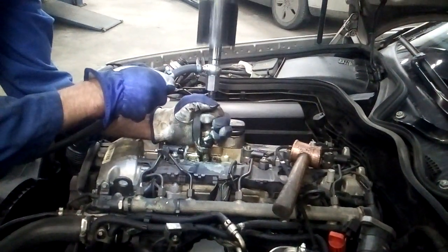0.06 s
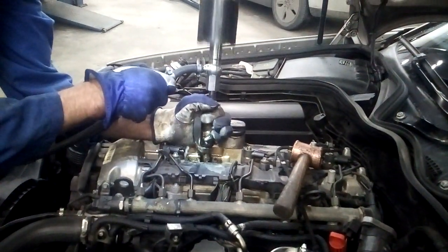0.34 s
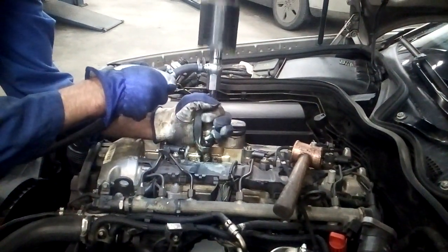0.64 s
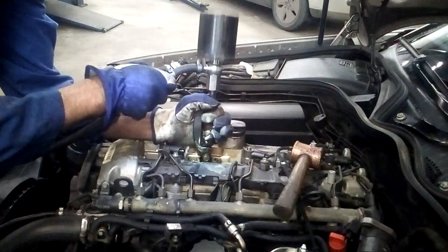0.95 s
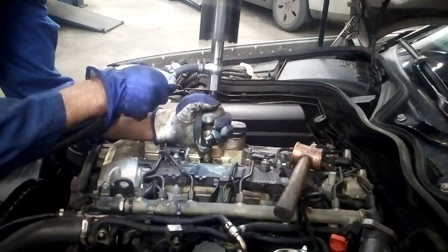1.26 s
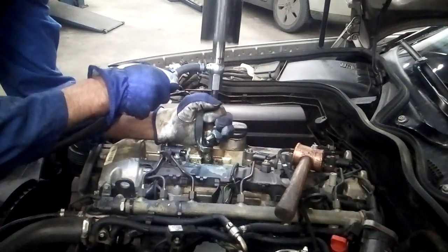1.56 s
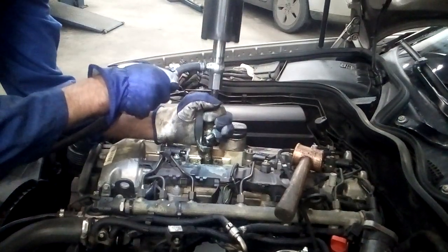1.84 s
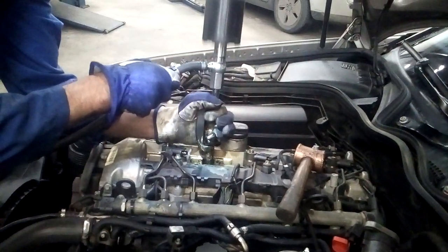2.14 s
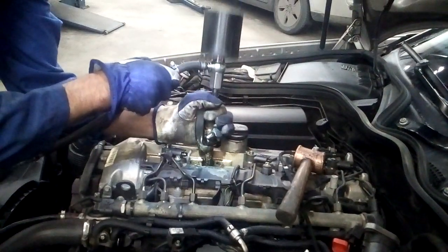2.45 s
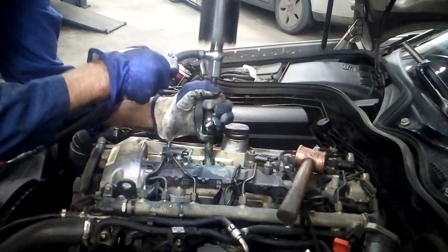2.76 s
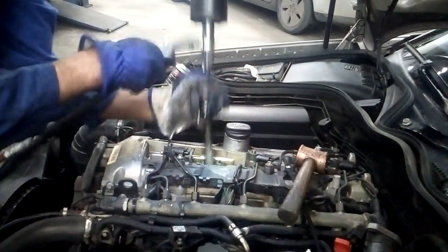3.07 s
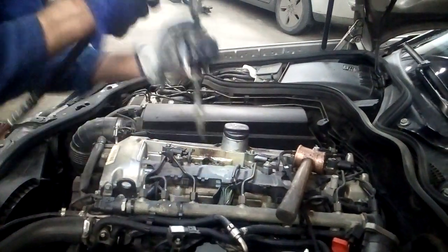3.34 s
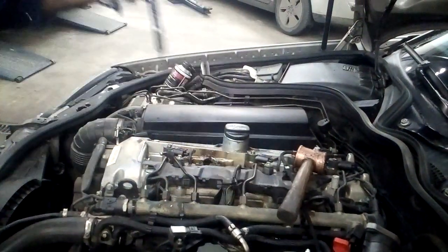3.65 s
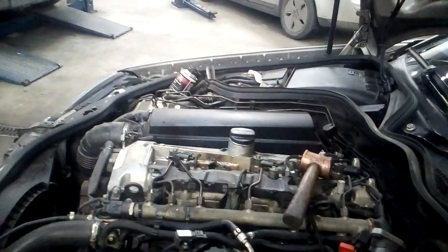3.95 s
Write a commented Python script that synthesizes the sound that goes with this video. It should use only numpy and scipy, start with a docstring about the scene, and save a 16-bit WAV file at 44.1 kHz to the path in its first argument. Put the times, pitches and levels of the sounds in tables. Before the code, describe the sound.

An air-driven slide hammer slams steel repeatedly, hissing between blows, in an echoing garage.

```python
"""A hiss of air, a thump and clack, then a slam of steel, over and over in an echoing garage bay.
It is an air-driven slide hammer pulling a stuck part out of an engine: air drives a weight,
which thumps and clacks as it turns at one end, then slams into the other. When the part comes free
the strokes run faster; then the air stops and the bay rings out over a machine hum.
The camera's gain control turns the sound down at every blow, and its left microphone is muffled."""
import sys
import numpy as np
from scipy import signal
from scipy.fft import rfft, irfft
from scipy.io import wavfile
from scipy.ndimage import uniform_filter1d, minimum_filter1d

SR = 44100
rng = np.random.default_rng(int(sys.argv[2]) if len(sys.argv) > 2 else 0)


def master(y):
    """Save y as 16-bit WAV."""
    cut = np.clip(np.atleast_2d(y).T, -1, 1)
    pcm = np.round(cut * 32767)  # scale
    wavfile.write(sys.argv[1], SR, pcm.astype(np.int16))


N = 176400  # 4 seconds


def amp(db):
    """Turns decibels into a number to multiply by."""
    return 10 ** (np.asarray(db) / 20)


def unit(x):
    """Scales a signal to an average (rms) level of 1."""
    return x / np.sqrt(np.mean(x ** 2) + 1e-20)


def look_up(table, hz):
    """Reads between a table's rows, with pitch spaced in octaves."""
    f, value = np.transpose(table)
    return np.interp(np.log(hz + 1), np.log(f + 1), value)


def add(mix, start_s, sound):
    """Mixes a sound in at the given time."""
    part = mix[max(round(start_s * SR), 0):][:len(sound)]
    part += sound[:len(part)]


def colour(x, tone):
    """Makes lows and highs louder or softer, following a tone table."""
    log_gain = np.log(amp(look_up(tone, abs(np.fft.fftfreq(8192, 1 / SR)))))
    response = np.exp(np.conj(signal.hilbert(log_gain)))  # rings after a hit, never before
    return signal.oaconvolve(x, np.fft.ifft(response).real[:4096])[:len(x)]


def noise(tone, size):
    """Noise of level 1; the table sets only its tone."""
    return unit(colour(rng.standard_normal(size), tone))


def wander(hz):
    """A random wobble, up to about hz times a second."""
    keep_slow = np.exp(-(np.fft.rfftfreq(N, 1 / SR) / hz) ** 2)
    return unit(irfft(rfft(rng.standard_normal(N)) * keep_slow, N))


# The low notes of a machine (f/Hz, level/dB)
HUM_NOTES = [(48.4, -43), (135, -48), (323, -51)]
# Tone of the background noise (f/Hz, level/dB)
BACKGROUND_TONE = [(25, -22), (60, -2), (130, -4), (350, -6.5), (1000, -17), (5000, -6.5), (10000, -56)]
def workshop(waver=0.0117, noise_db=-32.5):
    """A machine hums, wavering a little, over the dull background of the bay."""
    wavering_time = np.cumsum(1 + waver * wander(hz=7.3)) / SR
    hum = sum(amp(db) * np.sin(2 * np.pi * (hz * wavering_time + rng.random())) for hz, db in HUM_NOTES)
    return np.sqrt(2) * hum + amp(noise_db) * noise(BACKGROUND_TONE, N)


# How long the bay rings; "fade" is the time to drop by 60 dB (f/Hz, fade/s)
ECHO_FADE = [(100, .7), (1000, 1.3), (3000, 1.4), (6000, 1.0), (15000, .3)]
# Tone of the echo (f/Hz, level/dB)
ECHO_TONE = [(200, -4.5), (2000, -7), (5000, -10.5), (12000, -7.5)]
def bay_echo(x, gain_db=-13, build_s=0.089):
    """The bay smears each sound into a tail whose highest notes die first."""
    hz, t, bands = signal.stft(rng.standard_normal(SR * 2), SR, nperseg=256)
    fade = amp(-60 * t / look_up(ECHO_FADE, hz)[:, None])
    tail = signal.istft(bands * fade, SR, nperseg=256)[1]
    tail *= np.minimum(np.arange(len(tail)) / SR / build_s, 1)
    echo = signal.fftconvolve(x, tail / np.linalg.norm(tail))[:N]
    return amp(gain_db) * colour(echo, ECHO_TONE)


def metal_reflections(x, gain_db=1, fade_s=.03, size=1500):
    """High sounds bounce straight back off the metal around the camera."""
    bounces = rng.standard_normal(size) * amp(-60 * np.arange(size) / SR / fade_s)
    highs = signal.sosfilt(signal.butter(1, 600, "high", fs=SR, output="sos"), x)
    return amp(gain_db) * signal.oaconvolve(highs, bounces / np.linalg.norm(bounces))[:N]


# The whistle's strength next to the inlet hiss (t/s, level/dB)
WHISTLE_SWELL = [(1.2, -11), (1.33, 2), (1.39, 11), (1.53, 9), (1.78, 1), (2.0, -19)]
def valve_whistle(venting, pitch_hz=14860, sag_hz=90, wobble_hz=18, flutter_db=3):
    """The air valve's thin whistle sags in pitch as the air is let out."""
    hz = pitch_hz - sag_hz * venting + wobble_hz * wander(hz=61.6)
    db = np.interp(np.arange(N) / SR, *np.transpose(WHISTLE_SWELL)) + flutter_db * wander(hz=62)
    return amp(db) * np.sin(2 * np.pi * np.cumsum(hz) / SR)


def inlet_swish(travel, low_hz=8900, arch_hz=750, width_hz=600):
    """A narrow hiss that rises and falls in pitch as the weight travels (0 to 1)."""
    phase = 2 * np.pi * np.cumsum(low_hz + arch_hz * np.sin(np.pi * travel)) / SR
    return wander(width_hz) * np.cos(phase) + wander(width_hz) * np.sin(phase)


# Tone of the air flowing in (f/Hz, level/dB)
INLET_TONE = [(150, -15.5), (480, -7.5), (1500, -2), (2000, -2.5), (2400, 0), (3350, 1), (4400, -1),
              (5700, 1.5), (6600, 3), (8000, -3.5), (9300, -2), (11800, -9), (13600, -9.5), (15300, 1),
              (15700, -38)]
# Tone of the air let out (f/Hz, level/dB)
VENT_TONE = [(150, -10), (400, -12.5), (1800, -6), (2600, 2), (5400, 2.5), (6500, 9.5), (8000, -1.5),
             (13000, -7.5), (15300, 2), (15700, -30)]
def air(strokes, free_s=2.92, build_s=0.035, switch_s=0.0032, flutter_db=0.63):
    """Air hisses in until the weight turns, then out; with the part free it only hisses out."""
    t = np.arange(N) / SR
    inlet, vent, venting, travel = np.zeros((4, N))
    start = -.03
    for turn, blow, *_ in strokes:
        span = (t >= start) & (t < blow)
        elapsed = t[span] - start
        travel[span] = np.minimum(elapsed / (turn - start), 1)
        venting[span] = turned = np.clip((t[span] - turn) / switch_s, 0, 1)
        if blow > free_s:
            vent[span] = amp(-4.5 - 11 * turned)  # loud, easing at the turn
        else:
            soft_start_db = -11.5 * np.clip(1 - elapsed / build_s, 0, 1)
            inlet[span] = amp(-19 + soft_start_db) * (1 - turned)
            vent[span] = amp(-25.5) * turned
        start = blow
    whistle = valve_whistle(venting)
    air_in = inlet * (amp(-9) * inlet_swish(travel) + noise(INLET_TONE, N) + whistle)
    air_out = vent * (noise(VENT_TONE, N) + amp(-3) * whistle)
    return (air_in + air_out) * amp(flutter_db * wander(hz=111))


THUMP_LEAD_S = 0.00429  # the thump starts just before the turn
def thump(end_hz=144.2, drop_hz=205, drop_s=0.0024, rise_s=0.0029, decay_s=0.0059):
    """The air cushion's short knock, dropping in pitch, with little deep bass."""
    t = np.arange(4000) / SR
    hz = (end_hz + drop_hz * np.exp(-t / drop_s)) * (1 + .04 * rng.standard_normal())
    loudness = np.minimum(t / rise_s, 1) * np.exp(-t / decay_s)
    push = loudness * np.sin(2 * np.pi * np.cumsum(hz) / SR)
    return signal.sosfilt(signal.butter(2, 100, "high", fs=SR, output="sos"), push)


# Tone of the dull knock (f/Hz, level/dB)
KNOCK_TONE = [(40, -14), (130, 5), (800, 6), (1600, -10), (16000, -63)]
def knock(decay_s, size=4000):
    """The freed part's heavy knock, with no ring."""
    return noise(KNOCK_TONE, size) * np.exp(-np.arange(size) / SR / decay_s)


def ping(hz, decay_s=.0042):
    """One bright note of the loose steel; its pitch depends on how the part sits."""
    t = np.arange(4000) / SR
    return np.sqrt(2) * np.sin(2 * np.pi * hz * t) * np.exp(-t / decay_s)


def strike(tone, notes, decay_s, ring_db=-9.5, rise_s=0.00096, detune=0.0058, vary_db=2):
    """Steel on steel: a noisy crash and a few ringing notes, never quite the same twice."""
    t = np.arange(6000) / SR
    hz, db, fade_s = np.transpose(notes)[:, :, None]
    level, shift, phase = rng.standard_normal((3, len(notes), 1))
    waves = np.sin(2 * np.pi * (hz * (1 + detune * shift) * t + phase))
    ring = (amp(db + vary_db * level - 60 * t / fade_s) * waves).sum(0)
    ring /= np.sqrt(np.sum(amp(db) ** 2) / 2)
    crash = noise(tone, len(t)) * np.exp(-t / decay_s)
    return np.minimum(t / rise_s, 1) * (crash + amp(ring_db) * ring)


# Tone of the clack (f/Hz, level/dB)
CLACK_TONE = [(300, -15.5), (650, -15.5), (1700, -9), (3300, -5.5), (4700, -9.5), (6400, -1.5), (7000, -12),
              (13000, -21), (15000, -6), (16000, -21)]
# Ringing notes of the tool's tube (f/Hz, level/dB, fade/s)
TUBE_NOTES = [(2030, 4, 0.021), (3270, 9.5, 0.037), (4280, 5, 0.05), (6120, -25, 0.02), (6140, -8.5, 0.064)]
def clack():
    """The weight turns round and sets the tube ringing."""
    return strike(CLACK_TONE, TUBE_NOTES, decay_s=0.0073)


# Tone of the main blow (f/Hz, level/dB)
SLAM_TONE = [(40, -33), (150, -5.5), (300, -7.5), (500, -1.5), (750, -2), (1100, -3.5), (2200, 3),
             (4400, 1), (6200, 2), (8000, -4), (11000, -9.5), (13800, -8.5), (14900, 7.5), (15400, -62),
             (16000, -4)]
def slam(notes, **settings):
    """The weight hits the far end with a sharp crash."""
    return strike(SLAM_TONE, notes, rise_s=0.00069, **settings)


# Fast strokes with the part free (turn t/s, blow t/s, blow level/dB, ping f/Hz, ping level/dB)
FAST_STROKES = [(3.033,3.0354,7.5,1850,-11),(3.122,3.1235,5.5,3060,-14),(3.2077,3.2215,4,2770,-7),(3.287,3.3081,3.5,2420,-9),
                (3.38,3.397,4.5,2436,-9),(3.467,3.488,2.5,3120,-5.5),(3.559,3.5778,2.5,2510,-8.5),(3.655,3.6719,-3.5,2310,-10.5)]
# Ringing notes of the loose steel (f/Hz, level/dB, fade/s)
LOOSE_NOTES = [(1170, 7.5, 0.016), (1450, 0, 0.017), (2160, -12, 0.019), (4950, -1, 0.06), (5794, 2, 0.053),
               (7080, -2.5, 0.053)]
# Clinks of the loose steel (t/s, level/dB)
CLINK_HITS = [(2.8786, -12), (2.9607, 2.5), (3.192, 2), (3.8148, -3.5)]
# Tone of a clink (f/Hz, level/dB)
CLINK_TONE = [(200, -9), (2500, 0), (6000, 8.5), (7500, -11), (16000, -21)]
def hammer_free(break_s=3.036):
    """The part breaks free: each stroke thumps, slams, pings and knocks, and loose steel clinks."""
    out = np.zeros(N)
    for turn, blow, blow_db, ping_hz, ping_db in FAST_STROKES:
        force = amp(10 + blow_db)
        add(out, blow, force * slam(LOOSE_NOTES, decay_s=0.0056, ring_db=-6, detune=0.0234))
        add(out, turn - THUMP_LEAD_S, amp(-7) * thump())
        add(out, blow, force * amp(ping_db) * ping(ping_hz))
        add(out, blow, amp(-7) * knock(decay_s=0.0056))
    for start_s, db in CLINK_HITS:
        add(out, start_s, amp(db) * strike(CLINK_TONE, LOOSE_NOTES, decay_s=0.0023))
    add(out, break_s, amp(14) * knock(decay_s=.006))
    return out


# Strokes against the stuck part (turn t/s, blow t/s, clack level/dB, blow level/dB)
STUCK_STROKES = [(0.0614,0.1094,6,-6),(0.205,0.2472,7,-2.5),(0.3422,.385,4,-4),(0.4805,0.5228,2,-6),(0.619,0.6617,1.5,-5.5),(0.7567,0.7993,-0.5,-5.5),
                 (0.894,0.937,2,-6),(1.031,1.0734,3.5,-5.5),(1.169,1.21,7,-2.5),(1.305,1.347,7.5,-5),(1.4417,1.483,4,-3.5),(1.579,1.62,0,-5.5),
                 (1.7163,1.7593,0,-5.5),(1.8548,1.8982,-2,-6),(1.995,2.0378,-1.5,-5),(2.134,2.1777,2,-5.5),(2.275,2.3172,-2,-7),(2.416,2.4566,-12,-5.5),
                 (2.555,2.5991,-9,-4.5),(2.702,2.742,0,-2.5),(2.864,2.9093,-10,8)]
# Ringing notes of the steel while the part is stuck (f/Hz, level/dB, fade/s)
STUCK_NOTES = [(1116, 1.5, 0.025), (1370, 2, 0.0098), (1695, 3, 0.04), (2003, 3.5, 0.039),
               (3310, -2, 0.077), (4000, 2.5, 0.026), (5090, -5.5, 0.076), (6030, 1, 0.057),
               (6574, -7, 0.11)]
def hammer_stuck():
    """The weight thumps and clacks at one end, then slams into the other."""
    out = np.zeros(N)
    for turn, blow, clack_db, blow_db in STUCK_STROKES:
        add(out, turn - THUMP_LEAD_S, amp(-5 + 0.44 * clack_db) * thump())  # grows with the clack
        add(out, turn, amp(-6 + clack_db) * clack())
        add(out, blow, amp(6.5 + blow_db) * slam(STUCK_NOTES, decay_s=0.008, ring_db=-3.5))
    return out


def scene():
    """The tool close by and the bay around it, left and right."""
    tool = hammer_stuck() + hammer_free() + air(STUCK_STROKES + FAST_STROKES)
    background = workshop()
    left = tool + metal_reflections(tool) + bay_echo(tool)
    right = tool + bay_echo(tool)
    return np.array([left, right]) + background


def gain_control(x, limit_db=-14.5, squeeze=0.76, recover_db_per_s=165, sense_s=0.0013, ahead_s=0.0075):
    """The camera's volume setting: it drops just ahead of each peak, then comes back up."""
    power = uniform_filter1d(x ** 2, round(sense_s * SR))
    power_db = 10 * np.log10(abs(power) + 1e-12)
    half = round(ahead_s * SR / 2)
    coming_peak_db = -minimum_filter1d(-power_db, 2 * half + 1, origin=-half)
    recovery_db = np.arange(N) / SR * recover_db_per_s
    held_db = np.maximum.accumulate(coming_peak_db + recovery_db)
    held_db = np.maximum(held_db, -6)  # starts turned down by an earlier stroke
    over_db = np.maximum(held_db - recovery_db - limit_db, 0)
    return amp(-squeeze * uniform_filter1d(over_db, size=200))


# How much the left microphone muffles the sound (f/Hz, level/dB)
LEFT_MIC_TONE = [(140, 0), (280, -12.5), (550, -21), (2200, -32.5), (4500, -36), (15000, -43)]
def record(dry, top_hz=15800):
    """The camera muffles the left side, turns down and overloads on peaks, and cuts the top treble."""
    mics = np.array([colour(dry[0], LEFT_MIC_TONE), dry[1]])
    overloaded = np.clip(mics * gain_control(mics[1]), -1, 1)
    treble_cut = signal.firwin(255, top_hz, window=("kaiser", 9), fs=SR)
    return signal.oaconvolve(overloaded, treble_cut[None], "same")


dry = scene()
out = record(dry)
master(out)
```